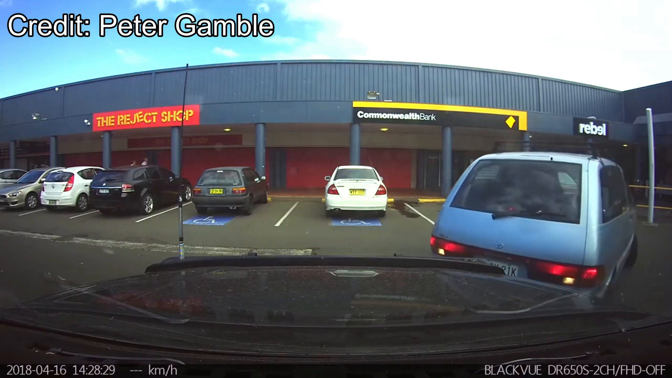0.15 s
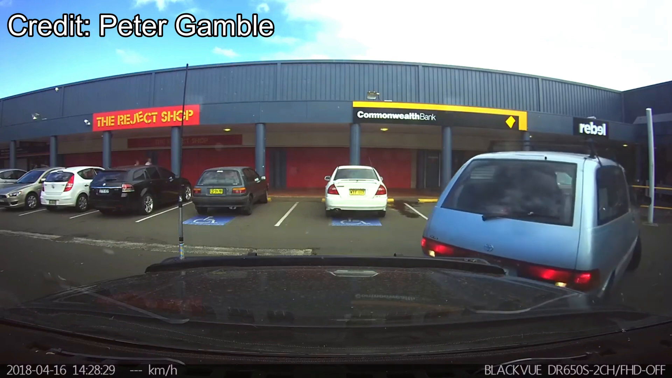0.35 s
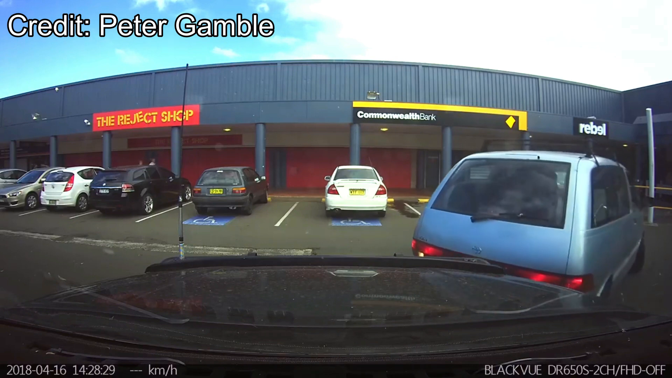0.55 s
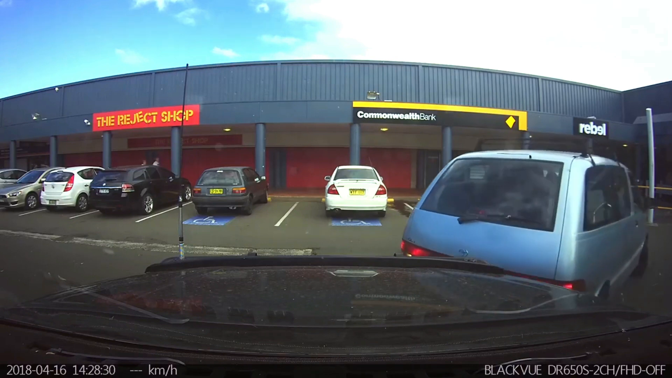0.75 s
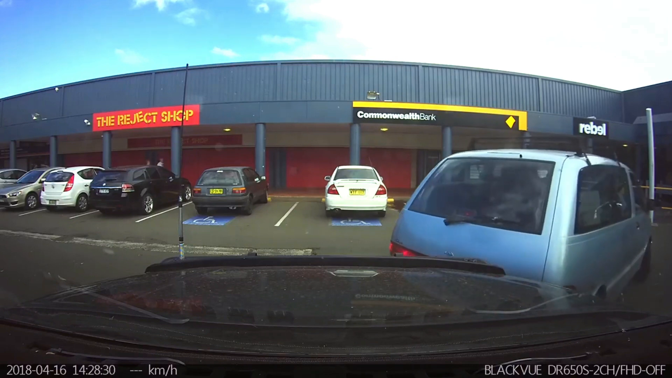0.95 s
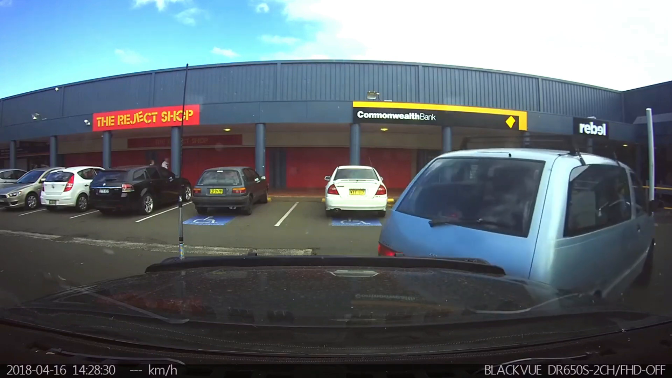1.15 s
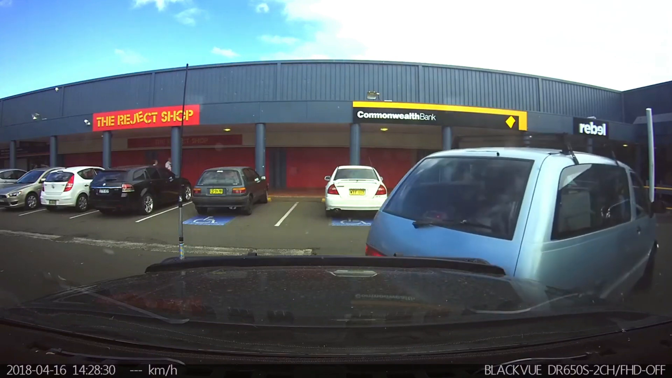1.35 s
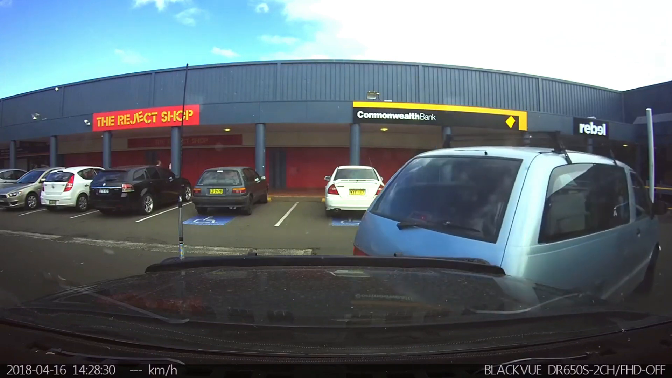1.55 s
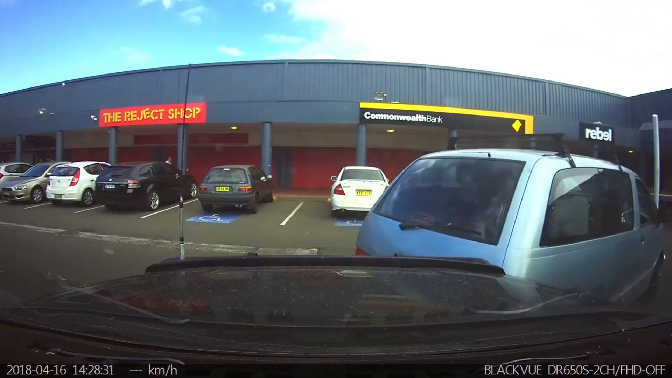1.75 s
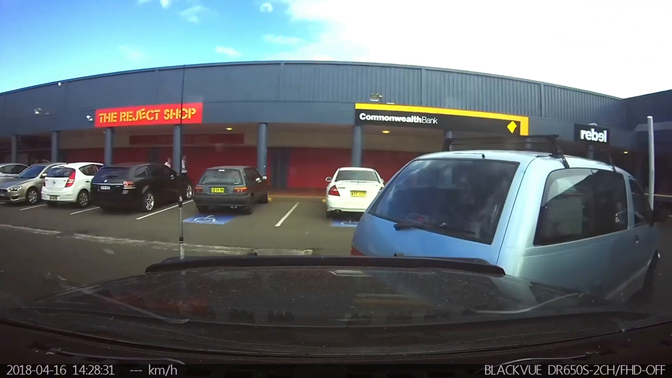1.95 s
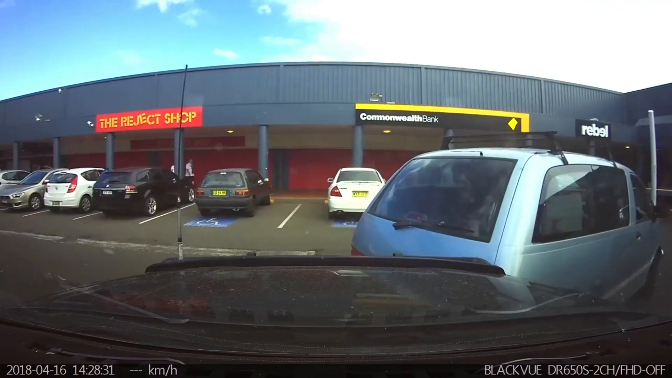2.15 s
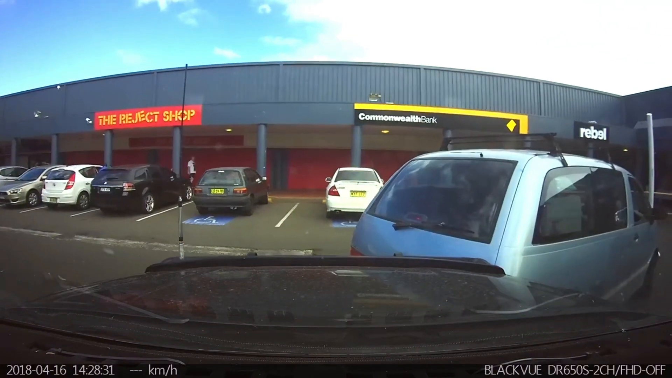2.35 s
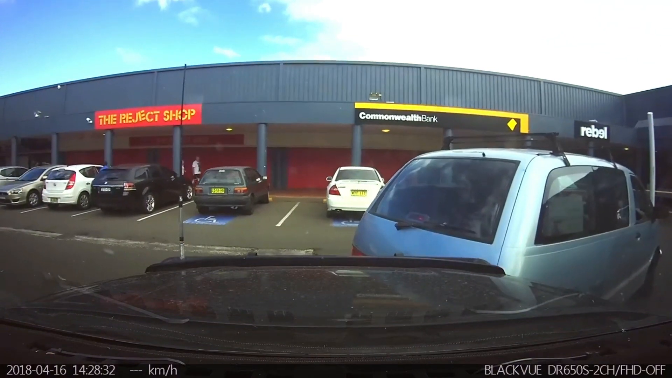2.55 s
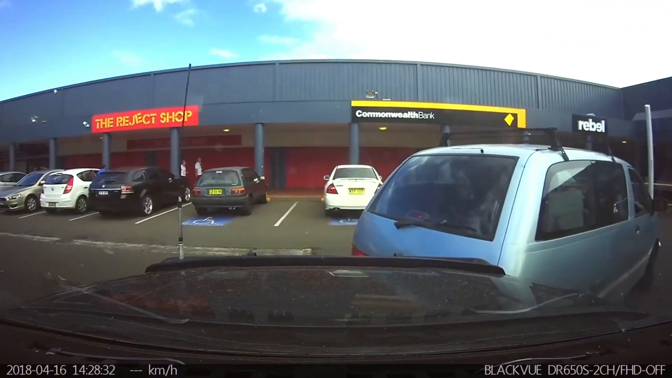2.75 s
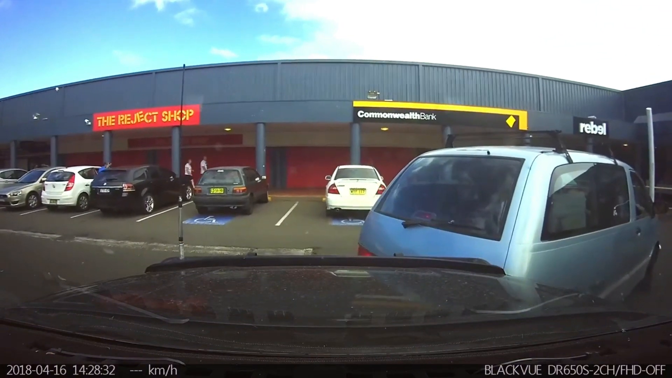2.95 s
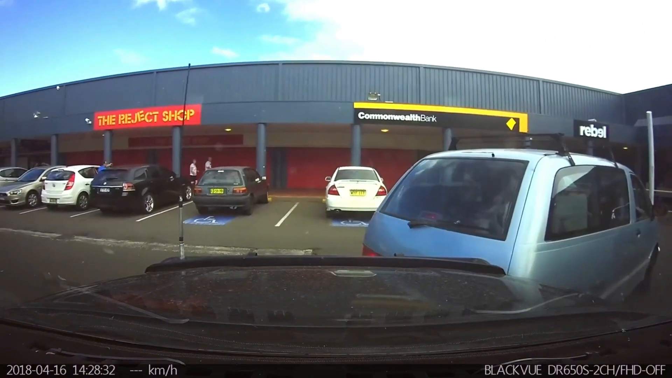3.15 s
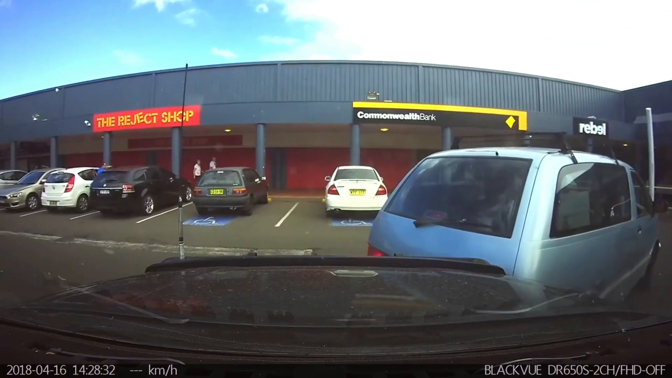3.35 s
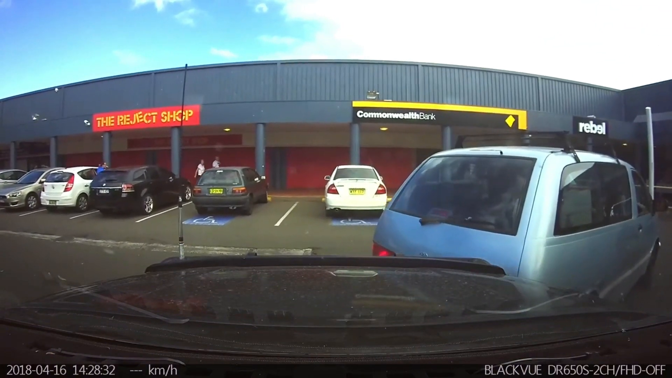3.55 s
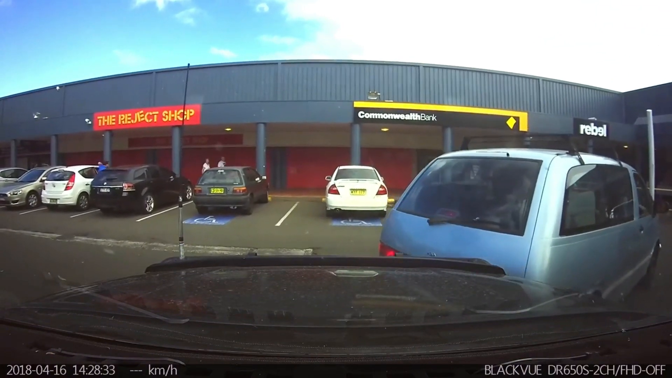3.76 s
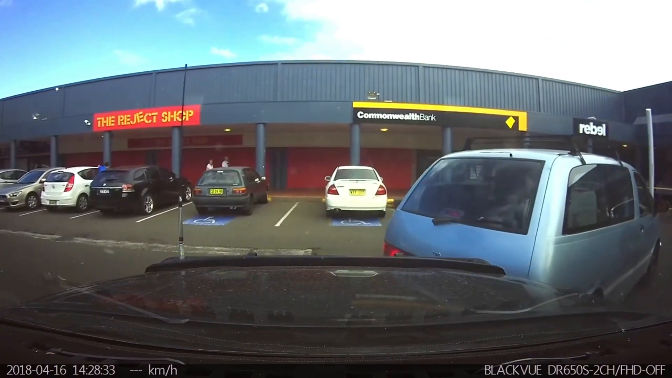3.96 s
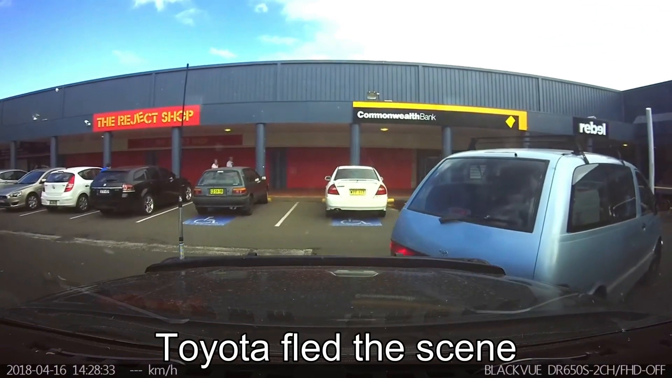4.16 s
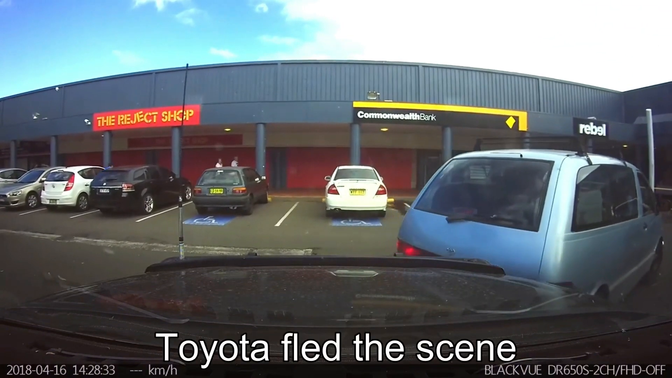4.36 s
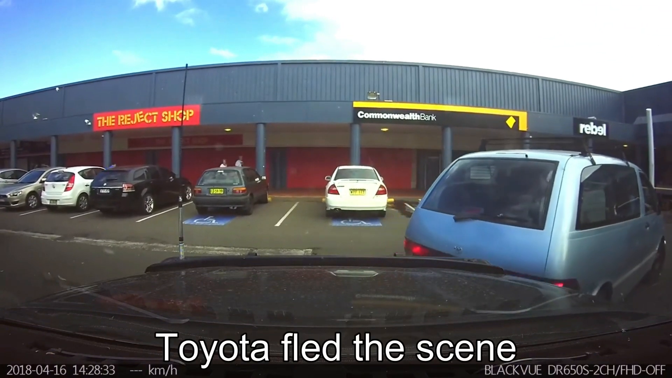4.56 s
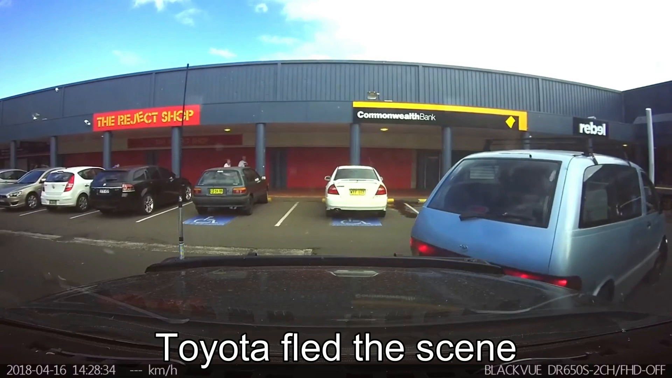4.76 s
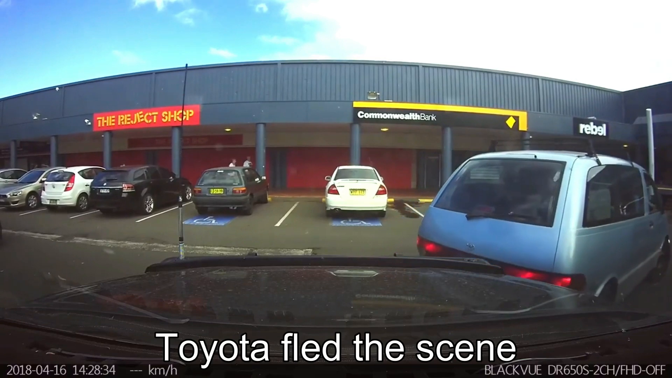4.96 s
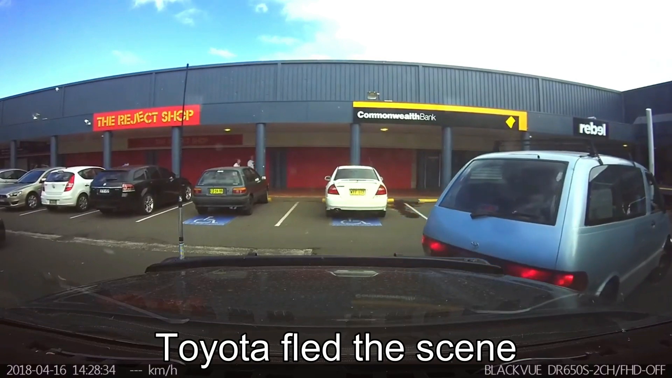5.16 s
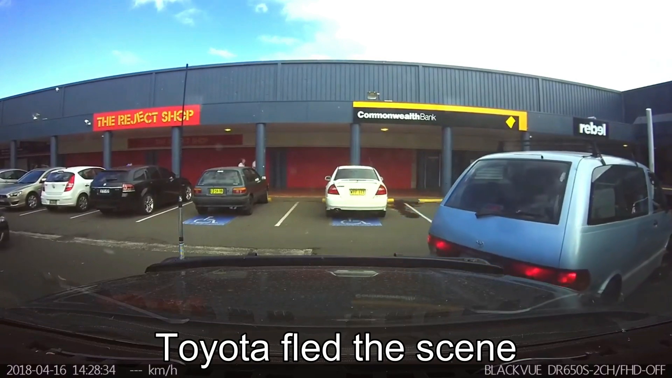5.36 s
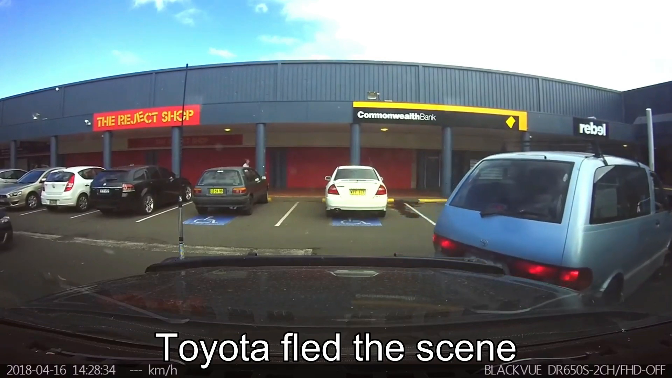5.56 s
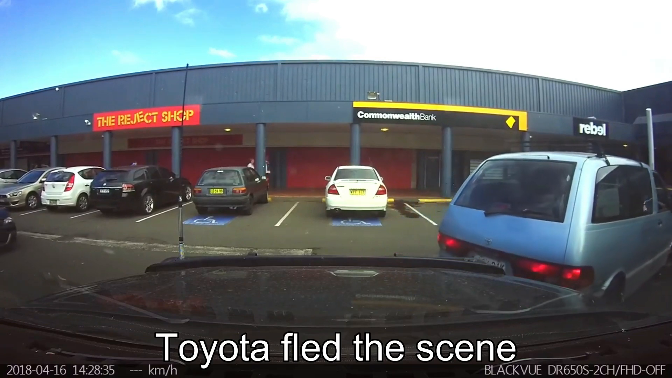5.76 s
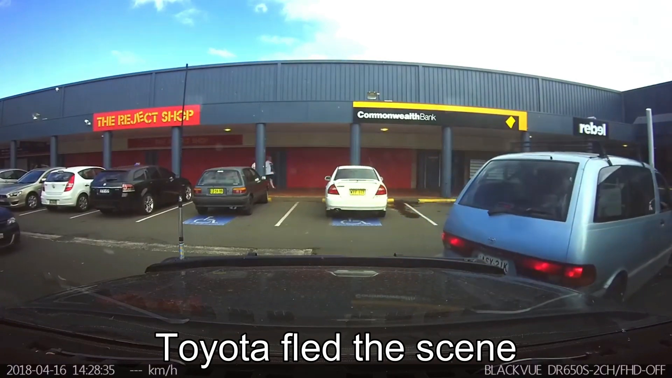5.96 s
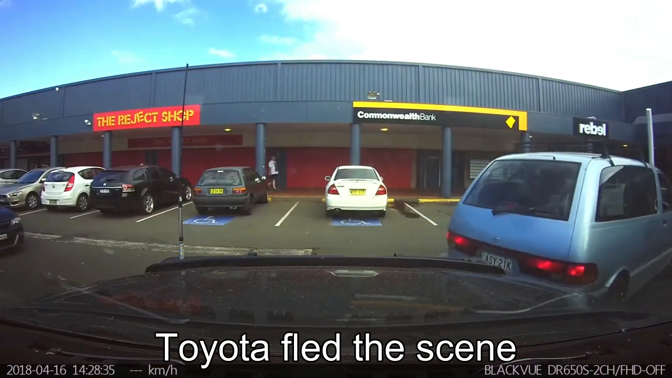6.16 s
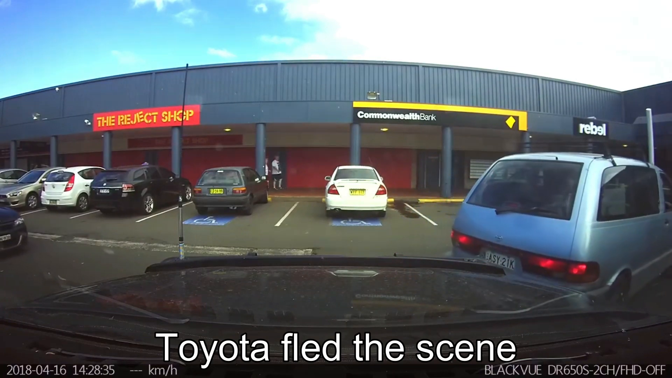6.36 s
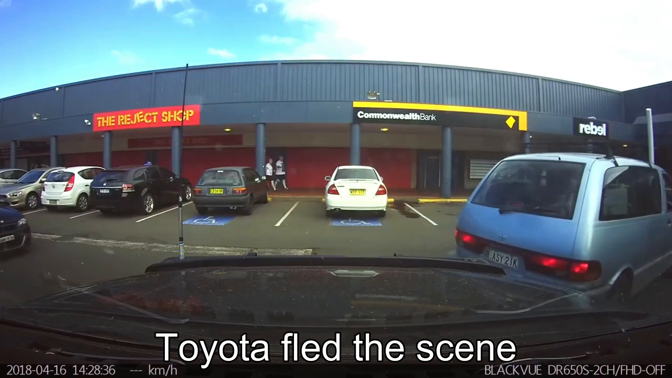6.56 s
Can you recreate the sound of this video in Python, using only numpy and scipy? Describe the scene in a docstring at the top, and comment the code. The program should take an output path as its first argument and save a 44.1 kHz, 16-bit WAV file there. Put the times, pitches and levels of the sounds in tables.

```python
"""Inside a parked car: a van idles close by from the start, a loping stack of lines over rumble and hiss.
At about 1.7 s it backs into the bumper: dense cracks crush the plastic and soft shoves boom the shell.
From then on loose trim knocks, each contact ringing sets of short modes; from 2.2 s a fainter chatter
swells with the rocking car and fades. A small dash camera, sampling slowly, hears it all dull."""
import sys
import numpy as np
from scipy import signal
from scipy.fft import rfft, irfft
from scipy.io import wavfile
from scipy.ndimage import uniform_filter1d

SR = 44100
rng = np.random.default_rng(int(sys.argv[2]) if len(sys.argv) > 2 else 0)


def materialize(psi):
    """Save the field psi as 16-bit PCM at rate SR to the path in sys.argv[1].

    A 1-D psi becomes a single channel; in a 2-D psi each row is a channel.
    """
    bounded = np.clip(np.atleast_2d(psi).T, -1, 1)
    quanta = np.round(bounded * 32767).astype(np.int16)
    wavfile.write(sys.argv[1], SR, quanta)


N = 295470

# Steady rumble and microphone hiss. Each row: frequency in Hz, density in dB per Hz.
FLOOR_SPECTRUM = [(10, -73.5), (18, -71.5), (26, -60.5), (40, -58), (52, -63), (95, -70), (170, -81.5),
                  (280, -83.5), (450, -92.5), (800, -103), (1600, -110), (3200, -114.5), (7500, -123)]
# Van engine at idle. Each row: time in seconds, firing rate in Hz, firing line level in dB with its uneven swells.
ENGINE_IDLE = [(0.0, 36.15, -48.5), (0.2, 33.58, -44), (0.42, 38.7, -32), (0.62, 35.08, -42.5),
               (0.86, 37.83, -29), (1.02, 35.56, -32.5), (1.6, 35.25, -34.5), (1.7, 33.57, -35),
               (1.9, 36.65, -26), (2.04, 36.88, -43.5), (2.24, 36.4, -31.5), (2.44, 35.18, -34.5),
               (2.86, 34.98, -37.5), (3.28, 37.7, -37), (3.41, 35.33, -38), (3.57, 35.61, -30.5),
               (3.78, 34.16, -40.5), (3.92, 34.64, -34.5), (4.07, 34.38, -49), (4.3, 34.89, -36),
               (4.5, 34.65, -46), (4.65, 35.18, -33), (4.78, 34.23, -49), (4.93, 35.08, -33.5),
               (5.12, 35.38, -36.5), (5.24, 34.17, -53), (5.38, 34.88, -39), (5.54, 34.66, -42.5),
               (5.68, 35.77, -33), (5.85, 34.9, -44), (5.97, 35.4, -38.5), (6.3, 35.23, -39),
               (6.47, 34.64, -46), (6.65, 35.34, -37.5)]
# Weaker engine lines. Each row: multiple of the firing rate, level in dB before throb and waver.
SIDE_ORDERS = [(.75, -52), (1.5, -50.5), (3., -57), (3.5, -56.5), (4.5, -60.5), (6., -64), (7., -68),
               (8., -66.5), (10.5, -70.5)]
# Dashboard trim modes: low panel, hollow, middle, crack and high.
# Each row: frequency in Hz, relative level in dB, 60 dB decay time in seconds.
PANEL_MODES = [(193, 0, 0.093), (266.3, 3, 0.066), (322, -6, 0.075), (344, 1, 0.043), (453, -1, 0.025)]
HOLLOW_MODES = [(496, -2, 0.016), (613, 0.5, 0.015), (703, 1, 0.016), (736, 3.5, 0.017), (850, 0.5, 0.013)]
MIDDLE_MODES = [(1030, 1, 0.012), (1116, -0.5, .009), (1160, 3, 0.015), (1270, -1.5, 0.01)]
CRACK_MODES = [(1300, -1, .008), (1573, 2, 0.012), (1785, 0.5, 0.0079), (2007, -1, 0.0069),
               (2200, -6.5, 0.0038)]
HIGH_MODES = [(2640, 2.4, 0.0062), (2950, 7, 0.008), (3170, 7.9, 0.012), (3460, 5, .007),
              (3800, 4.5, 0.007)]
# Trim knocks. Each row: start in seconds, peak of the middle modes in dB, then the hollow, crack, high
# and snap peaks in dB against it, and scrape in dB (before a common offset).
KNOCKS = [(1.728, -42, 2, -1, -0.5, -10, 5), (1.755, -29.5, 2.5, -3.5, -23, -30, 2.8),
          (1.841, -40.5, 7, -12.5, -20.5, -28, 4), (1.864, -31.5, -4, -3.5, -27, -40, 0.93),
          (1.913, -52, -3, 0.5, -21.5, -30, 7.4), (2.024, -57, 11.5, 2, 5, -11, 6),
          (2.091, -54.5, -15, -22, -11, -29, 7.3), (2.166, -62.5, 15, -7, -5, -10, 5.7),
          (2.204, -33, -1.5, -9, -24, -32, 0.8), (2.267, -37, -29, 0, -22, -24, 0.93),
          (2.277, -47, 7.5, -14, -15, -37, 0.91), (2.309, -58, 9.5, -23, -17, -20, 6.9),
          (2.441, -57, -12, -4, -15, -18, 1.1), (2.459, -60, -5, -6, -6, -10, 1),
          (2.5, -49.5, 6, -9, -17, -17, 1.1), (2.511, -66, 20, -3, -14, -15, 8.9),
          (2.541, -31.5, -5, -6, -22.5, -32.5, 0.98), (2.576, -68, 9, -5, 2, -12, 1),
          (2.602, -53.5, 9, -5, 2.5, -15, 0.85), (2.608, -40, -4.5, -14, -21, -29, 7.2),
          (2.639, -59, 1, -6.5, -15, -17, 8), (2.708, -60, 4.5, -17, -11, -15, 8),
          (2.777, -62, -9, -14, -1, -16, 1.5), (2.813, -65, -7, -7, 2, -9, 0.94),
          (2.823, -63, 13.5, 1, -14, -15, 7), (2.863, -38.5, 1, -9, -28, -39, 1.04),
          (2.877, -32, -5, 1.5, -17, -26, 1.9), (2.909, -56, 12.5, -7, -21, -19, 10),
          (2.975, -44.5, -3, -13, -23, -22, 1.1), (3.12, -58, -2, -12, -9, -10, 6),
          (3.132, -57.5, 11, 0, -6, -13, 9), (3.173, -38, -0.5, -3, -30, -28, 0.94),
          (3.195, -51, -6, -22, -9, -26, 0.96), (3.233, -51, 7.5, -7, -0.5, -18, 4.14),
          (3.258, -50.5, -8, -9, -20, -27, 9.1), (3.306, -63, -6, -10, -19, -20, 4.5),
          (3.337, -53, 0.5, -25, -13, -15.5, 3.3), (3.374, -69, 7, -15, -14, -18, 0.9),
          (3.394, -59.5, -3, -19, -14, -20, 0.95), (3.419, -65, 0, -10, -5, -11, 2.7),
          (3.497, -63, 6, -8, -14, -13, 8.15), (3.52, -37.5, -7.5, 7, -14, -22, 0.98),
          (3.567, -49, 9.5, -2, -27, -21, 1), (3.587, -50.5, 5, -1, -21, -23, 1),
          (3.679, -64, 11, -14, -11, -8.5, 9.3), (3.727, -61.5, 4, -15, -10, -7, 7.75),
          (3.858, -60, 7, -6, -13, -14, 9.04), (3.889, -43, -2.5, -9, -25, -21, 6.7),
          (4.647, -53, -4, -10, -22, -14, 1.127), (4.79, -71, 4, -6, -3, 0, 1),
          (5.13, -67, 6, -11, -10, -17, 8.23), (5.168, -51, -4, -7, -27, -16, 1.03)]
# Body shell and cabin air. Each row: frequency in Hz, relative level in dB, 60 dB decay time in seconds.
SHELL_MODES = [(13.98, -10, 1.21), (28.5, -2, 1), (51, -8.5, 0.14), (114, -8.5, 0.2), (192, -17.5, 0.1),
               (240, -12, 0.072)]
# Shoves on the car body. Each row: start in seconds, strength in dB, pitch factor of the loaded shell.
SHOVES = [(1.702, -19, 0.926), (1.726, -18, 0.94), (1.76, -16.5, 1.02), (1.83, -18.5, 1.035),
          (1.862, -25.5, 1.14), (1.915, -31, 1.1), (1.99, -31.5, 0.99), (2.152, -32.5, 0.86)]
# Bumper crushing. Each row: time in seconds, level in dB, treble and low groan in dB against that level.
CRUSH_LEVELS = [(1.675, -81, -7, 17), (1.697, -59, -14, 15), (1.71, -55, -7, 15.5),
                (1.73, -51.5, -6.5, 22.5), (1.745, -47.5, -5, 12), (1.76, -44.5, -8.5, 11),
                (1.772, -44, -15, 11.5), (1.78, -51.5, -18, 9.5), (1.81, -49, -17, 12),
                (1.85, -50, -18.5, -0.5), (1.89, -52.5, -24, 3.5), (1.93, -57, -26, 8),
                (1.975, -54, -30, -1), (2.0, -63, -25, 13), (2.015, -64, -22.5, 13), (2.05, -66.5, -14, 15),
                (2.3, -77.5, -33, 21.5)]
# Broad colour of the folding plastic. Each row: centre in Hz, width in Hz, relative level in dB.
CRUSH_GROAN = [(218.3, 148, 2.5), (277.7, 117, -3), (378, 350, -8)]
CRUSH_MIDDLE = [(627, 160, 9.5), (830, 250, 1), (1150, 220, 4.5), (1440, 310, -2.5), (1800, 270, -13)]
CRUSH_TREBLE = [(2460, 1000, 17), (2870, 680, 1.5), (3720, 580, 11), (5370, 460, -4)]
# Strained panels that ring about as loudly as the cracks.
# Each row: frequency in Hz, relative level in dB, 60 dB decay time in seconds.
STRAIN_MODES = [(620, 1, 0.16), (734, -1.5, 0.065), (926, -3, 0.09), (967, -3, 0.12), (1173, -3, 0.11),
                (1340, -3.5, .1), (1420, -3.5, 0.15), (1600, -7.5, 0.043)]
# Mirror of the sound about half the camera's sampling rate. Each row: frequency in Hz, gain in dB.
MIRROR_GAIN = [(7900, -6), (8900, -3.5), (11000, -13), (13000, -23), (14500, -41.5), (15500, -56)]

# Engine: the idle lopes in pitch and level.
THROB_HZ, THROB_PEAK_S = 2.88, 3.48
# the firing line's regular throb is negligible; its swells are in ENGINE_IDLE
FIRING_THROB_DB, UPPER_THROB_DB, WAVER_DB = -0.5, 3, 3.5
SECOND_DB, FOURTH_DB = -46, -50.5  # second and fourth multiples of the firing rate
LOPE_SHARE, WANDER_SHARE = 0.017, 0.0078  # of the firing rate
# Chatter: the car rocks on its springs and the chatter swells with it.
CHATTER_START_S, CHATTER_DB, CHATTER_FADE_DB_PER_S, CHATTER_FLICKER_DB = 2.2, -66.5, 5.5, 6
ROCK_HZ, ROCK_PEAK_S, ROCK_DB = 3.0, 3.2, 7.5
# Knocks: the panel thud grows more slowly than the knock.
THUD_DB, THUD_SLOPE, USUAL_KNOCK_DB = -3, 0.36, -41
SCRAPE_S = 0.0075  # decay time constant
CABIN_T60_S, CABIN_DB = 0.072, -14
CAMERA_RATE_HZ, CAMERA_TOP_HZ, TOP_HZ = 16000, 7350, 15600


def undb(db):
    """Decibels to an amplitude factor."""
    return 10 ** (np.asarray(db) / 20)


def unit(x):
    """Scale to an RMS of one."""
    return x / np.sqrt(np.mean(x ** 2))


def curve(table, silent=None):
    """Columns joined by straight lines in time; silent replaces them outside the table."""
    s, *columns = np.transpose(table)
    t = np.arange(N) / SR
    return [np.interp(t, s, c, left=silent, right=silent) for c in columns]


def walk(rate):
    """Random levels held 1 / rate s, smoothed twice over that time, with an RMS of one."""
    k = int(SR / rate)
    steps = np.repeat(rng.standard_normal(N // k + 1), k)
    return unit(uniform_filter1d(uniform_filter1d(steps, k), k)[:N])


def ring(modes, seconds, extra_db=0, detune=0):
    """Impulse response of decaying modes of alternating sign."""
    t = np.arange(int(seconds * SR)) / SR
    hz, db, t60 = np.transpose(modes)[:, :, None]
    sign = (-1.) ** np.arange(len(modes))[:, None]
    tone = np.sin(2 * np.pi * hz * (1 + detune) * t)
    decay = np.exp(-np.log(1000) * t / t60)
    return (sign * undb(db + extra_db) * tone * decay).sum(axis=0)


def add(out, s, x):
    """Mix x into out from s seconds on."""
    i = int(s * SR)
    out[i:i + len(x)] += x[:N - i]


def grit(rate, spread_db):
    """Random tiny cracks, about rate per second, a few much bigger than the rest."""
    when, size, sign = rng.random((3, N))
    strength = undb(-spread_db * np.log(np.maximum(size, .03)))
    return (when < rate / SR) * strength * np.sign(sign - .5)


def broad(x, bands):
    """Wide, steep resonances, summed to an RMS of one."""
    total = 0
    for hz, width, db in bands:
        sos = signal.butter(2, (hz - width / 2, hz + width / 2), "band", fs=SR, output="sos")
        total = total + undb(db) * signal.sosfilt(sos, x)
    return unit(total)


def soft(x, hz):
    """A yielding contact carries little above hz."""
    return signal.sosfilt(signal.butter(2, hz, fs=SR, output="sos"), x)


def floor():
    """Coloured noise: the low rumble swells slowly, the hiss stays nearly steady."""
    f = np.maximum(np.fft.rfftfreq(N, 1 / SR), 1)
    hz, db = np.transpose(FLOOR_SPECTRUM)
    shape = undb(np.interp(np.log(f), np.log(hz), db)) * np.sqrt(SR / 2)
    low = 1 / (1 + (f / 500) ** 2)  # power share of the rumble
    rumble = irfft(rfft(rng.standard_normal(N)) * shape * np.sqrt(low), N)
    hiss = irfft(rfft(rng.standard_normal(N)) * shape * np.sqrt(1 - low), N)
    return rumble * undb(2.2 * walk(3.7)) + hiss * undb(0.5 * walk(0.3) + 0.32 * walk(9))


def engine():
    """Idle boom: lines locked to the firing rate, whose pitch lopes while the upper lines throb and waver."""
    hz, firing_db = curve(ENGINE_IDLE)
    lope = 2 * np.pi * THROB_HZ * (np.arange(N) / SR - THROB_PEAK_S)
    throb = np.cos(lope)
    firing_hz = hz * (1 + LOPE_SHARE * np.sin(lope + 0.26) + WANDER_SHARE * walk(4))
    phase = 2 * np.pi * np.cumsum(firing_hz) / SR
    # sqrt(2) makes each line's level an RMS level
    out = np.sqrt(2) * undb(firing_db + FIRING_THROB_DB * throb) * np.sin(phase)
    for k, db in ((2, SECOND_DB), (4, FOURTH_DB)):
        line_db = db + UPPER_THROB_DB * throb + WAVER_DB * walk(5.5)
        out = out + np.sqrt(2) * undb(line_db) * np.sin(k * phase + k)
    for k, db in SIDE_ORDERS:
        line_db = db + 1.1 * throb + 2.28 * walk(6)
        out = out + np.sqrt(2) * undb(line_db) * np.sin(k * phase + 0.69 * walk(5))
    return out


def chatter():
    """Faint random contacts ring the trim, swelling with each rock of the car and steadily fading."""
    t = np.arange(N) / SR
    since = t - CHATTER_START_S
    chatter_db = CHATTER_DB - CHATTER_FADE_DB_PER_S * since + CHATTER_FLICKER_DB * walk(20)
    chatter_db = chatter_db + ROCK_DB * np.cos(2 * np.pi * ROCK_HZ * (t - ROCK_PEAK_S))
    contacts = grit(220, 4.7)
    modes = PANEL_MODES + HOLLOW_MODES + MIDDLE_MODES + CRACK_MODES
    body = signal.fftconvolve(soft(contacts, 1800), ring(modes, 0.11))[:N]
    high = broad(contacts + 0.87 * grit(2100, 2.4), CRUSH_TREBLE)
    return (since > 0) * undb(chatter_db) * (unit(body) + undb(-17) * high)


def shoves():
    """Soft 3 ms pushes of the bumper set the loaded shell booming."""
    out, push = np.zeros(N), np.hanning(int(0.003 * SR))
    for s, db, pitch in SHOVES:
        mode_spread_db = 4.5 * rng.standard_normal((len(SHELL_MODES), 1))
        boom = ring(SHELL_MODES, 1.5, mode_spread_db, pitch - 1)
        add(out, s, undb(db) * np.convolve(boom, push / push.sum()))
    return out


def knocks():
    """Each knock is a hard contact and short scrape that ring the trim, never quite alike, plus a brittle snap."""
    out, t = np.zeros(N), np.arange(int(0.036 * SR)) / SR
    snap_band = signal.butter(2, (3300, 6200), "band", fs=SR, output="sos")
    # each set of modes with the limit in Hz of the contact that drives it
    mode_sets = [(MIDDLE_MODES, 2000), (HOLLOW_MODES, 1300), (CRACK_MODES, 3000),
                 (PANEL_MODES, 700), (HIGH_MODES, 6000)]
    for s, db, hollow_db, crack_db, high_db, snap_db, scrape_db in KNOCKS:
        thud_db = THUD_DB - THUD_SLOPE * (db - USUAL_KNOCK_DB)
        chance = rng.standard_normal((4, len(t)))
        scrape = chance[0] * np.abs(chance[1]) * np.exp(-t / SCRAPE_S)
        contact = undb(scrape_db - 25.5) * scrape
        contact[0] = 1  # the hard contact itself
        snap_decay = 0.99 * np.exp(-t / 0.0028) + np.exp(-t / 0.019)
        parts = [signal.sosfilt(snap_band, chance[2] * snap_decay)]
        for k, (modes, soft_hz) in enumerate(mode_sets):
            gain, pitch = chance[3, 20 * k:][:2 * len(modes)].reshape(2, -1, 1)
            response = ring(modes, 0.12, 2.25 * gain, .03 * pitch)
            parts.append(np.convolve(soft(contact, soft_hz), response))
        for part, against_db in zip(parts, (snap_db, 0, hollow_db, crack_db, thud_db, high_db)):
            add(out, s, undb(db + against_db) * part / np.abs(part).max())
    return out


def crush():
    """A dense stream of cracks while the bumper folds; part of it rings the strained panels."""
    crush_db, treble_db, groan_db = curve(CRUSH_LEVELS, silent=-120)
    cracks = grit(600, 3.6) * undb(3.2 * walk(38))
    groan = broad(grit(1500, 1.6), CRUSH_GROAN)
    treble = broad(grit(1500, 3.3), CRUSH_TREBLE)
    singing = unit(signal.fftconvolve(cracks, ring(STRAIN_MODES, .2))[:N])
    middle = broad(cracks, CRUSH_MIDDLE) + undb(-0.5) * singing
    return undb(crush_db) * (middle + undb(treble_db) * treble + undb(groan_db) * groan)


def cabin(x):
    """Short dense echoes off glass and seats, duller than the direct sound."""
    t = np.arange(int(.25 * SR)) / SR
    decay = np.exp(-np.log(1000) * t / CABIN_T60_S)
    onset = np.minimum(t / 0.0012, 1)
    tail = soft(rng.standard_normal(len(t)), 1800) * decay * onset
    return x + undb(CABIN_DB) * signal.fftconvolve(x, tail / np.sqrt(np.sum(tail ** 2)))[:N]


def scene():
    """All sources in one channel; only the trim excites the cabin echoes."""
    trim = cabin(chatter() + knocks())
    return (floor() + engine() + shoves() + crush() + trim)[None]


def record(dry):
    """The camera samples slowly; raising the rate leaves a faint mirror image above its band; the top is cut."""
    band = signal.sosfilt(signal.ellip(8, .2, 60, CAMERA_TOP_HZ, fs=SR, output="sos"), dry)
    flipped = 2 * band * np.cos(2 * np.pi * CAMERA_RATE_HZ * np.arange(N) / SR)
    hz, db = np.transpose(MIRROR_GAIN)
    shape = undb(np.interp(np.fft.rfftfreq(2 * N, 1 / SR), hz, db, left=-90, right=-90))
    fade = np.minimum(np.arange(N, 0, -1) / (.01 * SR), 1)  # last 10 ms
    image = irfft(rfft(flipped * fade, 2 * N) * shape)[..., :N]
    return signal.sosfilt(signal.ellip(8, .2, 70, TOP_HZ, fs=SR, output="sos"), band * fade + image)


dry = scene()
out = record(dry)
materialize(out)
```